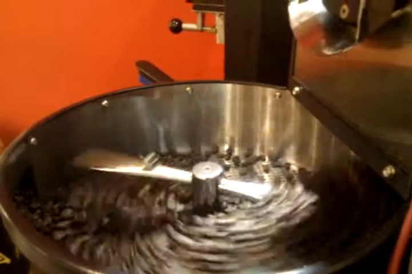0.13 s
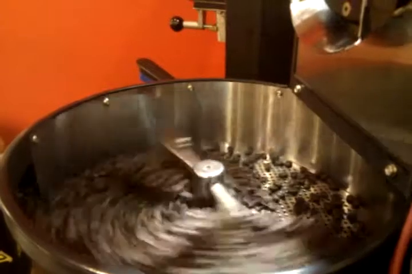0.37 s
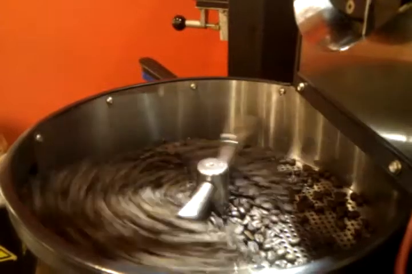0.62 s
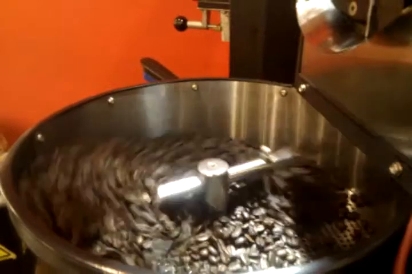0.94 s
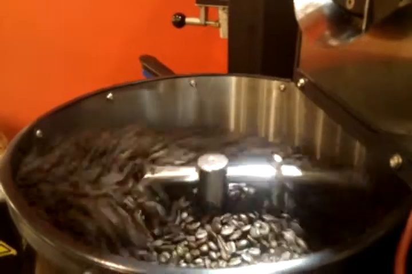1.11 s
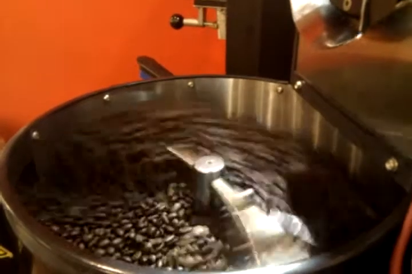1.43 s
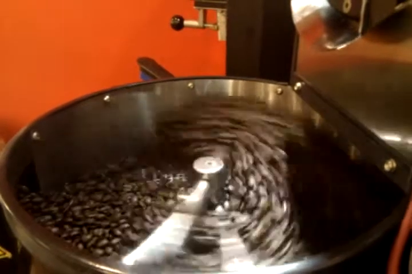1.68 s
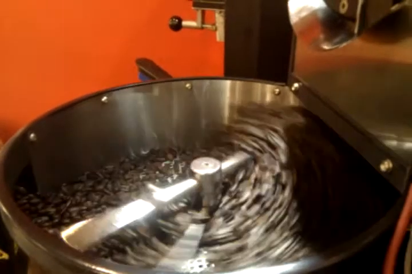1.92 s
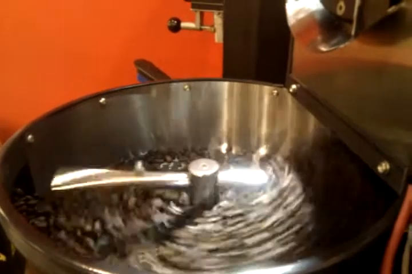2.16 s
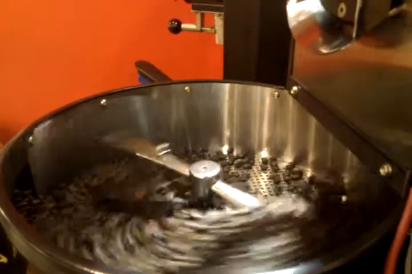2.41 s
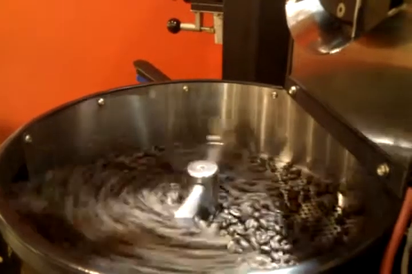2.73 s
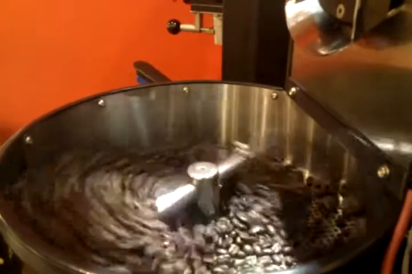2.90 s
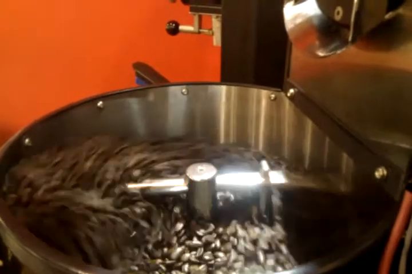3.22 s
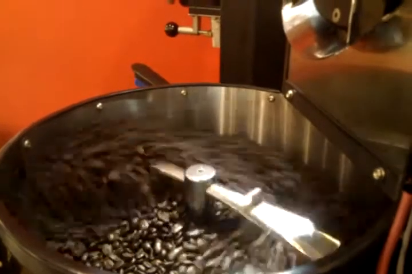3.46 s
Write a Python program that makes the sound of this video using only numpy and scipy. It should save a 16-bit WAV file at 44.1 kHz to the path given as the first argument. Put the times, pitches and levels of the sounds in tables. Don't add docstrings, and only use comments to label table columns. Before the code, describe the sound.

Roasted coffee beans swish and rattle around a steel cooling tray over a roaring fan

```python
import sys
import numpy as np
from scipy import signal
from scipy.fft import rfft, irfft, next_fast_len
from scipy.io import wavfile
from scipy.ndimage import uniform_filter1d, map_coordinates

SR = 44100
rng = np.random.default_rng(int(sys.argv[2]) if len(sys.argv) > 2 else 0)


def master(y):
    cut = np.clip(np.atleast_2d(y).T, -1, 1)
    pcm = np.round(cut * 32767)
    wavfile.write(sys.argv[1], SR, pcm.astype(np.int16))


def boost(x):
    u = np.asarray(x, float) / 20
    return 10 ** u


N = 157878

MAINS_HZ, SHAFT_HZ = 50.012, 24.883
CONVERTER_HZ = 16000
TIME_S = np.arange(N) / SR


def unit(x):
    return x / np.sqrt(np.mean(x ** 2) + 1e-20)


def along(points, hz):
    point_hz, value = np.transpose(points)
    return np.interp(np.log(hz + 1), np.log(point_hz + 1), value)


def wobble(rate_hz):
    knots = rng.standard_normal(int(N * rate_hz / SR) + 4)
    return map_coordinates(knots, [np.arange(N) * rate_hz / SR])


def filtered(x, response):
    size = next_fast_len(N + 8192)
    return irfft(rfft(x, size) * response(np.fft.rfftfreq(size, 1 / SR)), size)[:N]


def rush(spectrum, patchy_db):
    noise = signal.stft(rng.standard_normal(N), nperseg=256)[2]
    patches = uniform_filter1d(rng.standard_normal(noise.shape), size=5, axis=0)
    patches = uniform_filter1d(patches, size=8, axis=1)
    noise = signal.istft(noise * boost(patchy_db * unit(patches)), nperseg=256)[1][:N]
    return unit(filtered(noise, lambda hz: boost(along(spectrum, hz))))


def grains(start_s, pitch_hz, cycles, gain):
    k = np.arange(192)
    turns = pitch_hz[:, None] * k / SR
    waves = gain[:, None] * np.sin(2 * np.pi * turns) * np.exp(-np.pi * turns / cycles)
    at = np.clip((start_s * SR).astype(int), 0, N)[:, None] + k
    return np.bincount(at.ravel(), waves.ravel(), N + 193)[:N]


def capsule(hz):
    peak_hz, width_hz, peak_db = 7000, 1430, 19
    return 1 + boost(peak_db) * 1j * hz * width_hz / (peak_hz ** 2 - hz ** 2 + 1j * hz * width_hz)


def bean_flow_db():
    # time_s, level_db
    flow = [(0, -2), (.2, -1), (.27, 1.5), (.4, -0.5), (.6, 2.5), (.73, 2.5), (.8, 3.5), (1.099, 3),
            (1.349, 4.5), (1.549, -1), (1.801, 1.5), (2.03, 1.5), (2.299, 0.5), (2.601, 1.5), (2.8, 3),
            (3, 4), (3.25, 4), (3.58, 3)]
    return np.interp(TIME_S, *np.transpose(flow)) + 0.62 * wobble(40)


def sliding_beans(flow_db):
    # frequency_hz, density_db (per Hz)
    swish_spectrum = [(880, -59.5), (1500, -22), (4210, -13.5), (7000, -1), (9100, -12), (15400, -120)]
    return boost(-22.5 + 0.86 * flow_db) * rush(swish_spectrum, patchy_db=0.5)


def ticking_beans(flow_db):
    ticks_per_s, pitch_hz, pitch_spread, biggest_db = 2500, 5655, 0.31, 13
    count = int(ticks_per_s * N / SR)
    start_s = rng.random(count) * N / SR
    size_db = np.minimum(-3.5 * np.log(rng.random(count)), biggest_db)
    gain = boost(size_db) * np.sign(rng.random(count) - .5)
    tick_hz = np.clip(pitch_hz * np.exp(pitch_spread * rng.standard_normal(count)), 900, 7600)
    ticks = grains(start_s, tick_hz, 5, gain)
    return boost(-25.5 + 0.92 * flow_db + 0.67 * wobble(45)) * unit(filtered(ticks, capsule))


def tumbling_heaps():
    # middle_s, level_db, length_s, pitch_hz
    heaps = [(.012, -15.5, .02, 5000), (.076, -15.5, .011, 5200), (.111, -15.5, .009, 5500),
             (.152, -10, .018, 5200), (.19, -11.5, .015, 6100), (.245, -16, .035, 6500),
             (.348, -16.5, .02, 6500), (.446, -12.5, .016, 6000), (.504, -12.5, .014, 6800),
             (.535, -20.5, .016, 6800), (.75, -9, .014, 5200), (.772, -14.5, .02, 5500),
             (.83, -12.5, .025, 6000), (1.011, -12, .015, 6500), (1.084, -8.5, .01, 7000),
             (1.257, -21, .011, 5200), (1.53, -14, .022, 5000), (1.675, -17, .08, 4100),
             (1.749, -10, .008, 5400), (1.887, -11, .01, 6800), (1.987, -16.5, .025, 5500),
             (2.352, -11, .018, 6000), (2.432, -14.5, .009, 6500), (2.66, -18, .009, 5500),
             (2.695, -12.5, .02, 6000), (2.774, -9.5, .01, 6000), (2.9, -18, .025, 5500),
             (2.943, -10, .018, 6800), (3.012, -13, .01, 5200), (3.505, -14.5, .04, 5500)]
    middle_s, level_db, length_s, pitch_hz = np.transpose(heaps)[:, :, None]
    u = rng.random((len(heaps), 4, 40))
    late_s = (u[:, 0] + u[:, 3] - 1) * length_s
    knock_hz = np.clip(pitch_hz * np.exp(0.6 * (u[:, 1] - .5)), 900, 7600)
    gain = boost(level_db + 5 - 19 - 6.2 * u[:, 2]) * np.sqrt(length_s / .016)
    knocks = grains((middle_s + late_s).ravel(), knock_hz.ravel(), 11, gain.ravel())
    return filtered(knocks, capsule)


def flung_beans():
    # start_s, peak_db
    pops = [(0.5756, -7), (0.9522, -5), (1.5224, -6), (1.7464, -2), (1.8574, -5), (2.3476, -5),
            (2.6569, -6), (2.9014, -5), (2.9874, -4), (3.0131, -4), (3.0754, -5)]
    start_s, peak_db = np.transpose(pops)
    pitch_hz = 6300 * np.exp(.1 * rng.standard_normal(len(start_s)))
    return grains(start_s, pitch_hz, 6, boost(peak_db - 1))


def tray(x):
    t60_s, level_db = 0.026, -8
    t = np.arange(SR // 10) / SR
    decay = unit(rng.standard_normal(len(t)) * boost(-60 * t / t60_s)) / np.sqrt(len(t))
    return boost(level_db) * signal.fftconvolve(x, decay)[:N]


def fan_roar():
    # frequency_hz, density_db (per Hz)
    roar_spectrum = [(15, -40.5), (25, -21.5), (48, -10), (193, -2), (245, -10), (397, -3), (456, -10.5),
                     (709, -10.5), (3000, -14), (3900, -46), (6600, -120)]
    turn_s, loudest_s, swing_db = 1.97, 0.57, 1.56
    shade_db = swing_db * np.cos(2 * np.pi * (TIME_S - loudest_s) / turn_s)
    return boost(-34 + shade_db + 0.61 * wobble(14)) * rush(roar_spectrum, patchy_db=.8)


def tone(level_db, turns):
    return np.sqrt(2) * boost(level_db) * np.sin(2 * np.pi * (turns + rng.random()))


def motor_hum():
    # mains_multiple, level_db, swing_db, loudest_s, period_s
    hum = [(2, -50, 5.5, .6, 2.05), (4, -38, 3.5, .52, 2.08), (6, -44.5, 4, 0.24, .9),
           (12, -55.5, 3.5, .5, 2.1), (14, -49.5, 1, .5, 2.1), (16, -56, 5.5, .5, 2.7),
           (20, -58.5, 2, .5, 2.1), (22, -56.5, 5, .5, 2.1)]
    x = np.zeros(N)
    for multiple, level_db, swing_db, loudest_s, period_s in hum:
        shade_db = swing_db * np.cos(2 * np.pi * (TIME_S - loudest_s) / period_s)
        x = x + tone(level_db + shade_db + .4 * wobble(4), multiple * MAINS_HZ * TIME_S)
    return x


def shaft_whine():
    order_tones = [(10, 0), (16, 0), (29, 0), (32, -5), (32, -3), (32, -2), (32, 0), (32, 1), (48, -6),
                   (48, -5), (48, -4), (48, -3), (48, -2), (48, -1), (48, 0), (48, 2), (48, 3), (48, 4),
                   (45, 0), (49, 0), (50, 0), (55, 0)]
    order_levels = [-49.5, -45, -48.5, -49, -56, -55.5, -54.5, -53, -53.5, -58.5, -50, -65, -50.5, -51.5,
                    -44.5, -52, -60.5, -62.5, -63, -57.5, -62, -56]
    levels = {(order, 0): -66 for order in range(5, 63, 2)}
    levels.update(zip(order_tones, order_levels))
    spin = SHAFT_HZ * TIME_S + .0006 * wobble(2.9)
    x = np.zeros(N)
    for (order, side), level_db in levels.items():
        x = x + tone(level_db + 0.64 * wobble(2.4), order * spin + side * MAINS_HZ * TIME_S)
    return x


def scene():
    flow_db = bean_flow_db()
    swish = sliding_beans(flow_db)
    knocks = ticking_beans(flow_db) + tumbling_heaps() + flung_beans()
    fan = fan_roar() + motor_hum() + shaft_whine()
    return (swish + knocks + tray(knocks) + fan)[None]


def gain_control(x):
    # start_s, drop_db, recovery_s
    cuts = [
        (0.277, 7.5, 0.18),
        (1.26, 4.5, 0.16),
        (1.54, 0, 0.13),
        (2.046, 5, 0.27),
        (2.705, 4.5, 0.28),
        (3.525, 4, 0.35),
    ]
    cut_db = np.zeros(N)
    for start_s, drop_db, recovery_s in cuts:
        since_s = TIME_S - start_s
        cut_db += drop_db * np.clip(since_s / .003, 0, 1) * np.exp(-np.abs(since_s) / recovery_s)
    return x * boost(2.0 - cut_db)


def converter(x):
    # frequency_hz, level_db
    edge_curve = [(6000, -1), (7050, 1.5), (7410, -7), (7700, -16.5), (7900, -27), (8000, -61)]
    # frequency_hz, level_db
    image_curve = [(8000, -24.5), (8080, -14), (8300, -8.5), (8600, -19), (8950, -34.5), (9300, -42)]
    housing_dips = [(1540, 260, -3.5), (2800, 300, -2)]  # centre_hz, width_hz, level_db
    half_hz = CONVERTER_HZ / 2

    def passed(hz):
        dip_db = sum(db * np.exp(-((hz - centre) / width) ** 2) for centre, width, db in housing_dips)
        return boost(along(edge_curve, hz) + dip_db) * (hz < half_hz)

    def leaked(hz):
        return boost(along(image_curve, hz)) * (hz > half_hz) * (hz < CONVERTER_HZ)

    x = filtered(x, passed)
    mirror = 2 * x * np.cos(2 * np.pi * CONVERTER_HZ * TIME_S)
    return x + filtered(mirror, leaked) + .005


def band_limit(x):
    return signal.sosfilt(signal.butter(12, 9070, fs=SR, output="sos"), x)


def record(dry):
    mix = converter(gain_control(dry[0]))[None]
    return band_limit(mix)


dry = scene()
out = record(dry)
master(out)
```